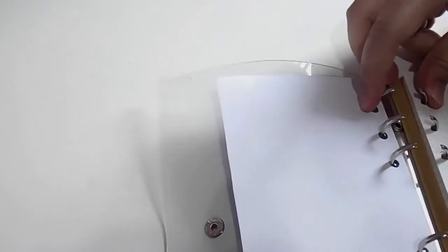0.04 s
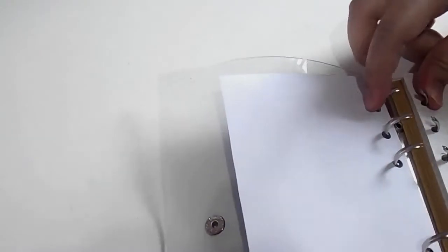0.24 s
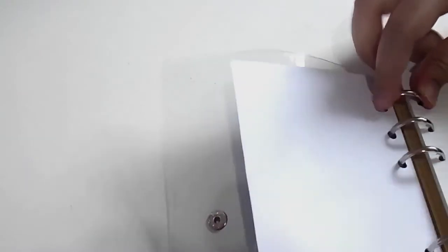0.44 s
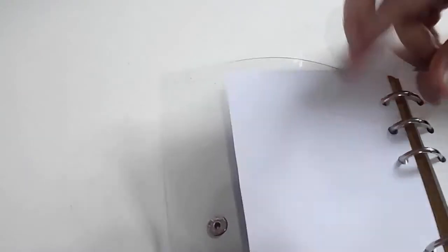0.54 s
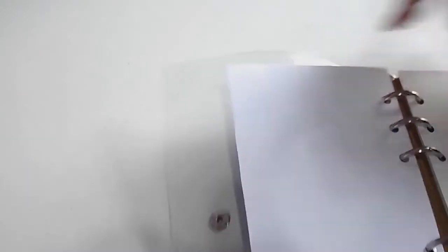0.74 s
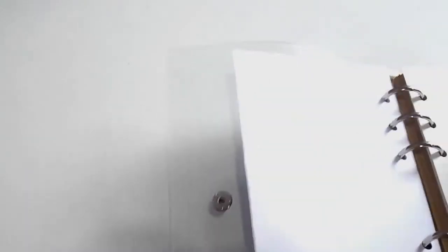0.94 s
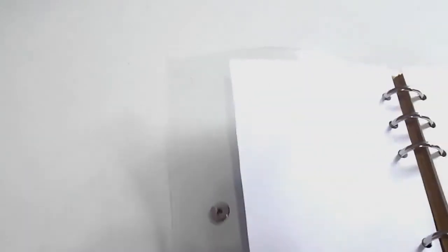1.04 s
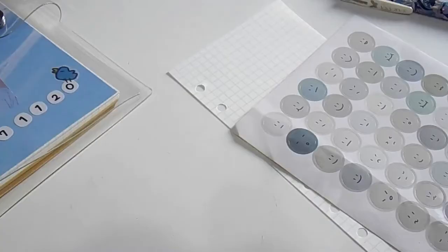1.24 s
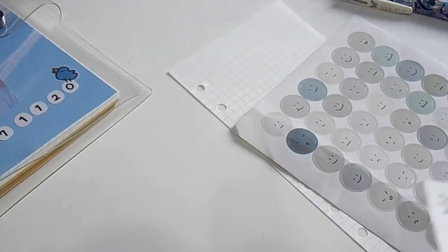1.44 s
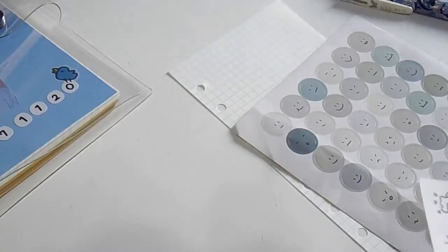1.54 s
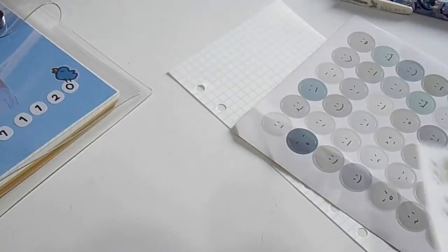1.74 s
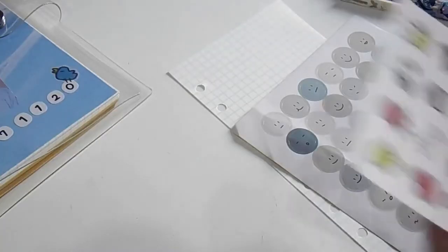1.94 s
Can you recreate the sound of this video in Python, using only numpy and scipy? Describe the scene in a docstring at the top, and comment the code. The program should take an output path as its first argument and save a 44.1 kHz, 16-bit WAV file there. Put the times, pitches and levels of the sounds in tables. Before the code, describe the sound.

A ring binder's steel rings snap shut at 0.2 s, a loud, bright, nearly merged double click distorting the close microphone. The spine knocks the table and bounces at 0.25 s; steel ringing and hard small-room echoes fade within about half a second. Faint taps come at 0.93 s, ticks and paper slides around 1.0-1.2 and 1.4 s, light taps at 1.55 and 1.74 s, then a tick and soft slide near 2 s, over quiet room noise.

```python
"""In a small bare room, the steel rings of a binder snap shut on a table, close to a microphone that overloads.
The snap is two clicks with short noise bursts; the ringing steel and the spine's knock are dying sine waves.
Hard echoes and a fading tail of noise make the room's answer.
Then come faint taps (short rings and clicks), ticks (noise bursts) and sliding paper (grainy noise).
Quiet, steady coloured noise lies under it all."""
import sys
import numpy as np
from scipy import signal
from scipy.fft import rfft, irfft
from scipy.io import wavfile

SR = 44100
rng = np.random.default_rng(int(sys.argv[2]) if len(sys.argv) > 2 else 0)


def output_pcm(signal):
    """Save a mono or channel-first signal as 16-bit PCM at the path in sys.argv[1].

    Samples are clipped to [-1, 1] before scaling.
    """
    pcm = np.clip(np.atleast_2d(signal).T, -1, 1) * 32767
    wavfile.write(sys.argv[1], SR, np.round(pcm).astype(np.int16))


N = 88200  # length in samples (2 s)

# All levels in the tables are relative, in dB.
# Steady room noise, its colour: pitch_hz, level_db
ROOM_NOISE_COLOUR = [(15, -77.5), (25, -40.5), (140, -10), (221, -12.5), (410, -6.5), (482, -5.5),
                     (523, -3.5), (871, -5.5), (1110, -10), (1300, -9), (2360, -13), (3170, -14.5),
                     (5730, -18.5), (8580, -19.5), (15500, -23)]
# Hard echoes of the near walls: delay_s, level_db
WALL_ECHOES = [(.0052, -11), (.0088, -8.5), (0.0125, -11.5), (.013, -3.5), (0.022, -9), (0.02, -12),
               (.0238, -13.5), (.0284, -7), (.036, -12.5)]
# How long the room's tail takes to fall by 60 dB: pitch_hz, fall_s
ROOM_FALL = [(60, 0.1), (300, .5), (1000, 0.59), (3000, 0.51), (6000, 0.49), (10000, .41), (15000, .32)]
# Paper sliding: loudest_s, level_db, rise_s, fall_s
SLIDES = [(1.015, -75.5, 0.023, 0.015), (1.16, -56.5, 0.11, 0.009), (1.411, -61, .02, 0.015),
          (1.98, -62.5, .25, .1)]
# Colour of sliding paper: pitch_hz, level_db
PAPER_COLOUR = [(150, -18.5), (700, 4), (2000, 2), (4500, 3), (8000, -3), (12000, -2.5), (15500, -8.5)]
# Crisp ticks of paper and plastic: start_s, level_db, fall_s (time to fall by 60 dB)
TICKS = [(.9995, -36, 0.013), (1.389, -29.5, 0.027), (1.409, -26, 0.03), (1.413, -26, 0.019),
         (1.8495, -37.5, .005), (1.9755, -30, .008)]
# Colour of a tick: pitch_hz, level_db
TICK_COLOUR = [(200, -28), (1500, 3.5), (4000, 3.5), (7500, -2.5), (10500, 1), (13500, -6), (15500, -8.5)]
# Light taps of things put down: start_s, level_db, pitch_hz, click_db (click against the ring)
TAPS = [(.9254, -26, 1060, -2.5), (.934, -32.5, 1234, -1), (1.3885, -33, 1160, 2.5),
        (1.546, -36, 647, -19.5), (1.736, -37, 1410, 7), (1.739, -32, 1240, 4)]
# Colour of the click in a tap: pitch_hz, level_db
TAP_CLICK_COLOUR = [(100, -15), (400, 1), (1500, 5), (4000, 0), (7000, -10.5), (15000, -16.5)]
# The spine hitting the table: start_s, level_db
KNOCKS = [(0.2154, 0), (0.254, -9.5)]
# Tones of spine and table: pitch_hz, level_db, fall_s (time to fall by 60 dB)
SPINE_TONES = [(348, -11.5, 0.044), (462.6, 1, 0.015), (1015, -0.5, 0.0093)]
# Lasting tones of the steel: pitch_hz, level_db, fall_s (time to fall by 60 dB)
STEEL_TONES = [(1032, -7.5, 0.43), (2368, -6.5, 0.57), (2498, -7.5, .45), (2660, -2.5, .4),
               (2684, -1.5, .45), (2850, 0, 0.56), (3030, -0.5, 0.56), (3095, -4, .38), (3246, -7.5, .35),
               (3360, -1, .28), (3596, -7.5, 0.42), (4700, -14.5, .35), (5669, -11.5, 0.5),
               (5922, -14.5, .45)]
# Ring halves meeting: start_s, level_db
SNAPS = [(.2037, -13), (.2063, -1)]
# Colour of the click when the rings meet: pitch_hz, level_db
SNAP_COLOUR = [(30, -40), (210, -42), (300, -17), (470, -17), (680, -20), (980, -9), (1250, -17),
               (1900, -17), (2350, -6), (2930, 1), (3380, -3), (3600, -13), (3950, -17), (4500, -14),
               (5100, -15), (5750, -8), (6400, -12), (6950, -20), (7700, -16), (8600, -19), (10300, -17),
               (14600, -19), (15700, -23)]
# Colour of the clash of the rings: pitch_hz, level_db
CLASH_COLOUR = [(200, -42.5), (1500, -12), (3000, 5.5), (9000, 4), (15500, -11)]

ROOM_NOISE_DB = -59
TAIL_DB, TAIL_BUILD_S = 1.5, 0.014
SMALL_ROOM_DB, KNOCK_ROOM_DB, CLASH_ROOM_DB = -10.5, -9, -14.5  # room's share of each sound
GRAIN_DB, GRAIN_HZ = 3, 483  # depth and rate of the paper's roughness
TAP_RING_FALL_S, TAP_CLICK_FALL_S = 0.018, 0.029  # time to fall by 60 dB
TONE_RISE_S = 0.0021
STEEL_DB = -22
SNAP_DB, CLASH_DB, CLASH_FALL_S = 18.5, -5, 0.0048
CLASH_GROWS = 0.68  # dB of clash per dB of contact level
CLIP_TOP, CLIP_HARDNESS = 1.0, 6  # full scale; a higher hardness bends more sharply
TOP_HZ = 15800


def amp(db):
    """Turn decibels into a plain multiplier."""
    return 10 ** (np.asarray(db) / 20)


def unit(x):
    """Scale a steady sound to an average (rms) level of 1."""
    return x / np.sqrt(np.mean(x ** 2) + 1e-20)


def unit_energy(x):
    """Scale a short sound to a total energy of 1."""
    return x / np.sqrt(np.sum(x ** 2) + 1e-20)


def along(points, hz):
    """Read a value between (pitch, value) points, with pitch on a log scale."""
    pitch, value = np.transpose(points)
    return np.interp(np.log(hz + 1), np.log(pitch + 1), value)


def convolve(x, h):
    """Let every sample of x set off a copy of h."""
    return signal.fftconvolve(x, h)[:N]


def pulse(colour, size=8192):
    """A click of unit energy with the given colour, with its energy packed at the start."""
    hz = np.fft.rfftfreq(size, 1 / SR)
    cepstrum = irfft(np.log(amp(along(colour, hz))))
    # folding the second half onto the first removes anything before the click
    cepstrum[1:size // 2] *= 2
    cepstrum[size // 2 + 1:] = 0
    return unit_energy(irfft(np.exp(rfft(cepstrum))))


def noise(colour):
    """Steady noise with the given colour and an rms of 1."""
    gain = amp(along(colour, np.fft.rfftfreq(N, 1 / SR)))
    return unit(irfft(rfft(rng.standard_normal(N)) * gain, N))


def fade(fall_s):
    """A smooth decay that falls by 60 dB in fall_s."""
    return np.exp(-np.log(1000) * np.arange(N) / SR / fall_s)


def ring(hz, fall_s):
    """One dying sine tone with a quick rise, like a struck object."""
    t = np.arange(N) / SR
    rise = 1 - np.exp(-t / TONE_RISE_S)
    return np.sin(2 * np.pi * hz * t) * fade(fall_s) * rise


def burst(colour, fall_s):
    """A dying puff of coloured noise, of unit energy."""
    puff = rng.standard_normal(N) * fade(fall_s)
    return unit_energy(convolve(puff, pulse(colour)))


def at(s, x):
    """Delay x so that it starts at s seconds."""
    return np.pad(x, (max(round(s * SR), 0), N))[:N]


def room_noise():
    """The quiet room: steady noise, strongest in the low middle."""
    return amp(ROOM_NOISE_DB) * noise(ROOM_NOISE_COLOUR)


def room(x):
    """Walls echo a sound; a tail of noise builds up, then fades at its own speed for each pitch."""
    hz, t, bands = signal.stft(rng.standard_normal(N), SR, nperseg=256)
    band_fade = np.exp(-np.log(1000) * t / along(ROOM_FALL, hz)[:, None])
    tail = signal.istft(bands * band_fade, SR, nperseg=256)[1][:N]
    build_up = 1 - np.exp(-np.arange(N) / SR / TAIL_BUILD_S)
    tail = unit_energy(tail * build_up)
    echoes = sum(amp(db) * at(s, x) for s, db in WALL_ECHOES)
    return amp(TAIL_DB) * convolve(x, tail) + echoes


def paper():
    """Sheets slide in grainy swells of noise and tick as they flex."""
    t = np.arange(N) / SR
    swell = sum(amp(db) * np.exp(-np.abs(t - s) / np.where(t < s, rise, fall))
                for s, db, rise, fall in SLIDES)
    grain = np.interp(t * GRAIN_HZ, np.arange(N), rng.standard_normal(N))  # slow random wobble
    rough = unit(noise(PAPER_COLOUR) * amp(GRAIN_DB * grain))
    ticks = sum(amp(db) * at(s, burst(TICK_COLOUR, fall_s)) for s, db, fall_s in TICKS)
    return swell * rough + ticks


def taps():
    """Each light tap is a short hollow ring with a dull click of noise."""
    out = np.zeros(N)
    for s, db, hz, click_db in TAPS:
        hollow = unit_energy(ring(hz, TAP_RING_FALL_S))
        click = amp(click_db) * burst(TAP_CLICK_COLOUR, TAP_CLICK_FALL_S)
        out += amp(db) * at(s, hollow + click)
    return out


def knock():
    """The recoil throws the spine on the table, where it bounces once; its tones die fast."""
    body = unit_energy(sum(amp(db) * ring(hz, fall_s) for hz, db, fall_s in SPINE_TONES))
    return sum(amp(db) * at(s, body) for s, db in KNOCKS)


def steel():
    """Rings and spring plate sing on after the closing contact, as many dying tones."""
    tones = sum(amp(db) * ring(hz, fall_s) for hz, db, fall_s in STEEL_TONES)
    closing_s = SNAPS[-1][0]
    return amp(STEEL_DB) * at(closing_s, tones)


def snap():
    """Ring halves meet in two contacts: spring-plate click and bright clash, both echoed by the room."""
    out = np.zeros(N)
    for s, db in SNAPS:
        click = amp(SNAP_DB + db) * at(s, pulse(SNAP_COLOUR))
        clash_db = SNAP_DB + CLASH_DB + CLASH_GROWS * db
        clash = amp(clash_db) * at(s, burst(CLASH_COLOUR, CLASH_FALL_S))
        out += click + clash + room(click) + amp(CLASH_ROOM_DB) * room(clash)
    return out


def scene():
    """Add up the room noise, the small handling sounds, the knock and the snap."""
    small = paper() + taps()
    thud = knock()
    answer = amp(SMALL_ROOM_DB) * room(small) + amp(KNOCK_ROOM_DB) * room(thud)
    return (room_noise() + small + thud + answer + steel() + snap())[None]


def record(dry):
    """The microphone squashes peaks near full scale; nothing is kept from TOP_HZ upwards."""
    clipped = dry / (1 + np.abs(dry / CLIP_TOP) ** CLIP_HARDNESS) ** (1 / CLIP_HARDNESS)
    kept = np.fft.rfftfreq(N, 1 / SR) < TOP_HZ
    return irfft(rfft(clipped) * kept, N)


dry = scene()
out = record(dry)
output_pcm(out)
```